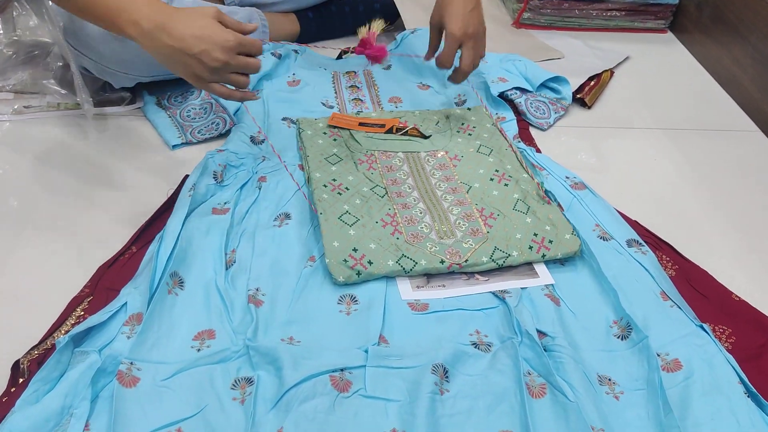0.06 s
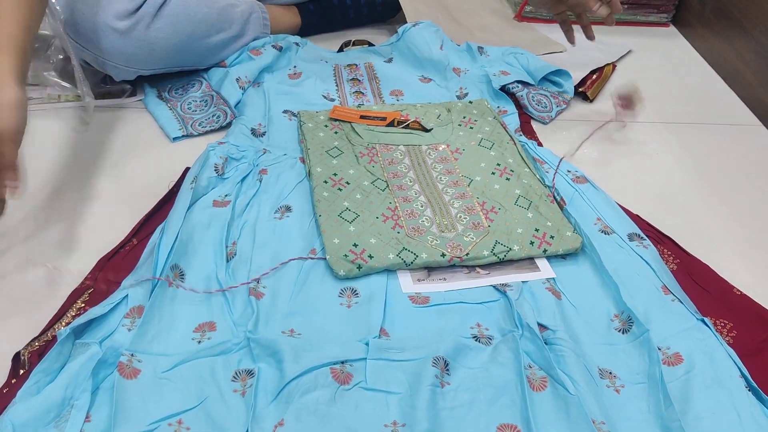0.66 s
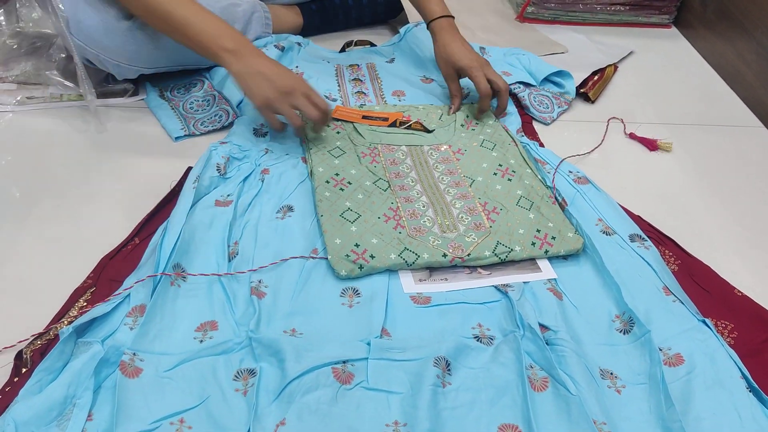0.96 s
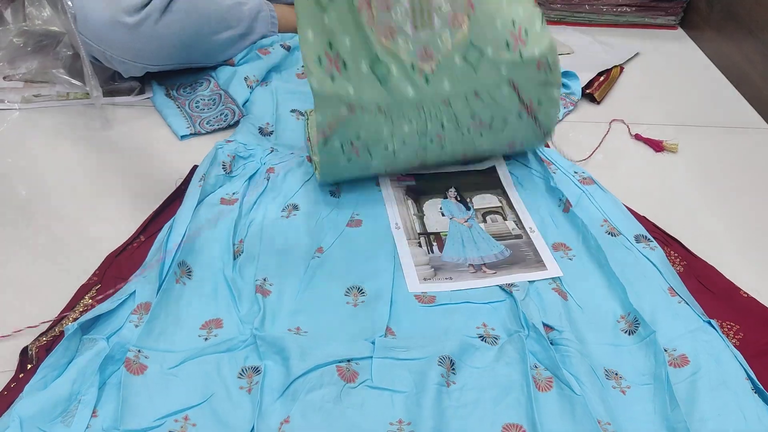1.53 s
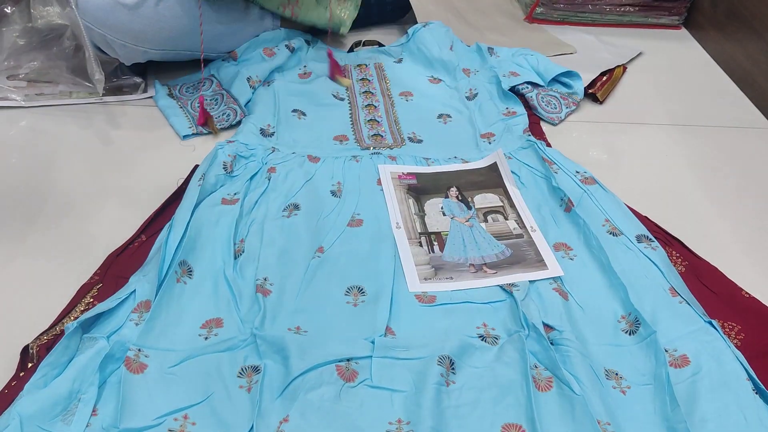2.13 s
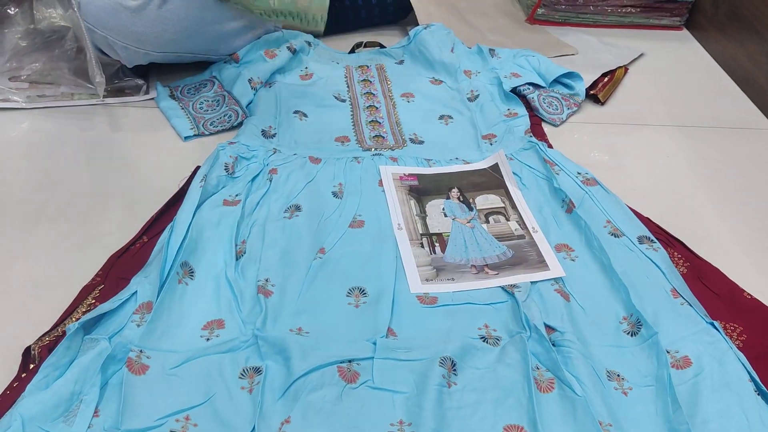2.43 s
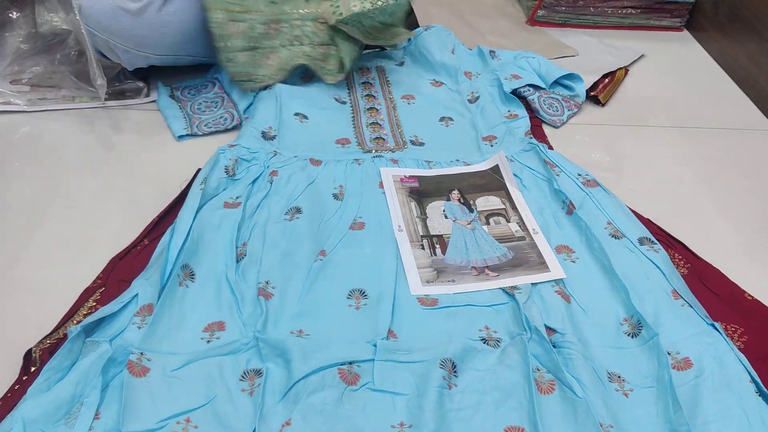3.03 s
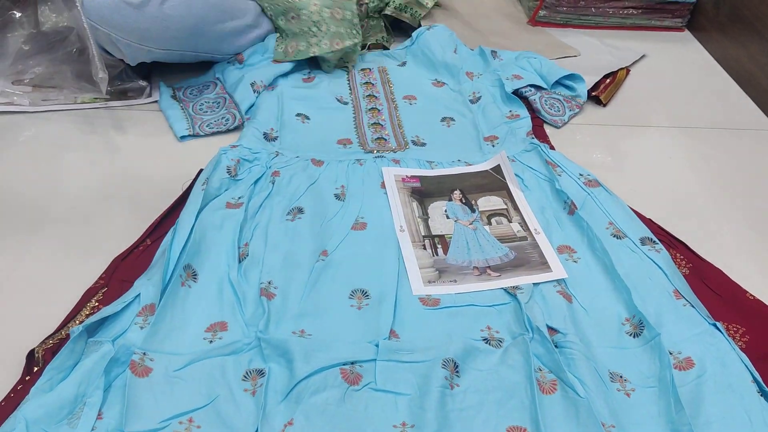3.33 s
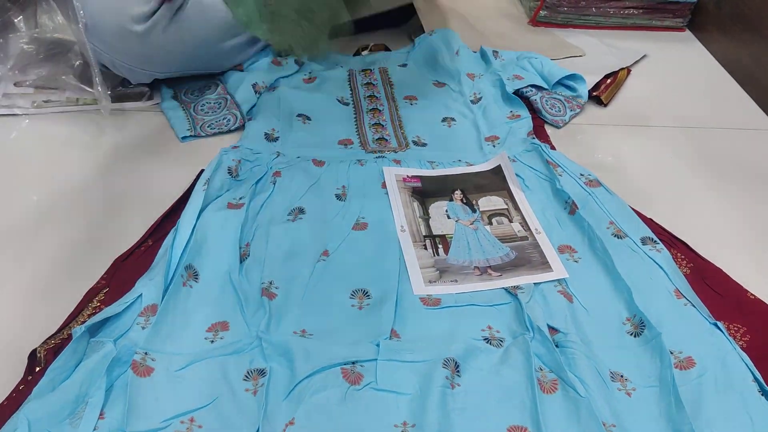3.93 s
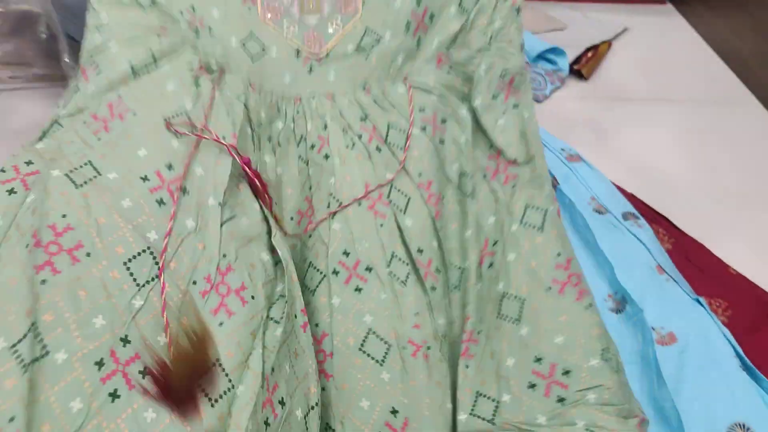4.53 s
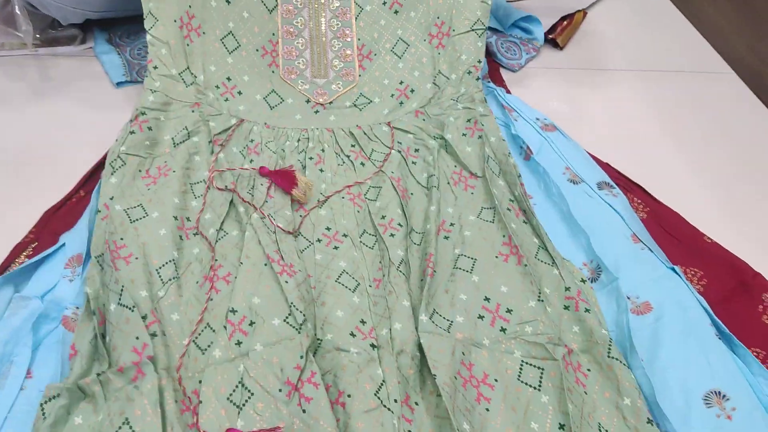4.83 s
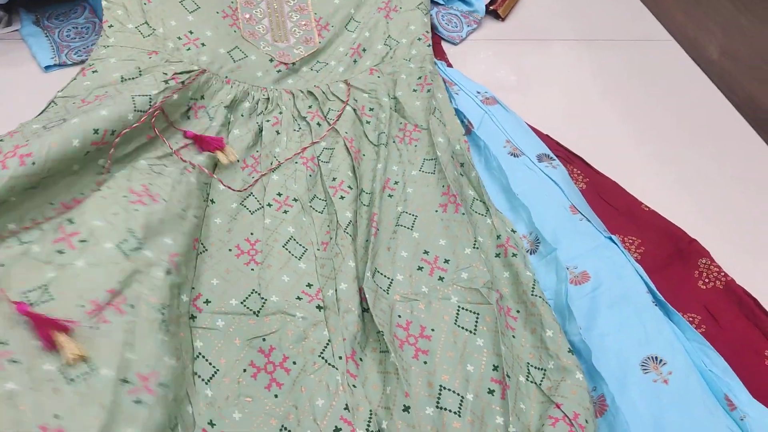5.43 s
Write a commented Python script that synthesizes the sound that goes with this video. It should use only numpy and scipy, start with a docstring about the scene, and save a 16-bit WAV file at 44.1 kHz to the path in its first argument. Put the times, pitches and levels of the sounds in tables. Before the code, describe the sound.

An electric fan whirs steadily for the whole five and a half seconds or so, and its draught buffets the microphone with uneven low rumble and thumps, stronger on the right at first. From about 1.8 to 2.5 seconds, metal trim on a dress clinks faintly as soft cloth swishing begins, with a crease snap and a tassel bead tick near 2.2 seconds. More rustling and small snaps come around 3 seconds, followed by a soft, very quick double knock on the table at 3.2. At 4 seconds the dress is shaken open with one heavy flap and louder swishes. The strongest rustle comes near 4.8 seconds, with a cluster of crisp snaps and another bead tick, then eases into lighter sliding. The handling is close, dry and slightly to the right. The gusts continue to the end, the hardest briefly ducking everything else.

```python
"""An electric fan whirs and its draught buffets the two microphone ports, each in its own way.
Over it a folded dress is lifted, shaken open and spread on a table: cloth swishes against cloth,
creases snap, tassel beads tick and the metal trim clinks, with a soft double knock on the table
and one heavy flap. The hardest puffs make a limiter duck everything for a moment."""
import sys
import numpy as np
from scipy.fft import rfft, irfft, next_fast_len
from scipy.io import wavfile
from scipy.ndimage import uniform_filter1d, minimum_filter1d, map_coordinates

SR = 44100
rng = np.random.default_rng(int(sys.argv[2]) if len(sys.argv) > 2 else 0)


def unload_wav(signal):
    """Save mono or channel-first audio to the path in sys.argv[1] as 16-bit WAV at rate SR, clipped to [-1, 1]."""
    wavfile.write(
        sys.argv[1],
        SR,
        np.round(np.clip(np.atleast_2d(signal).T, -1, 1) * 32767).astype(np.int16),
    )


N = 249606

# cloth sliding on cloth: (peak time [s], rise [s], fall [s], fold swish [dB], hem hiss [dB])
CLOTH_STROKES = [(2.15, 0.51, 0.65, -60, -58), (2.93, 0.087, 0.16, -56.5, -53.5), (3.45, 1, 1, -52, -65),
                 (4.012, 0.064, 0.17, -44, -55), (4.066, 0.035, 0.022, -43, -48),
                 (4.311, 0.0025, 0.07, -43, -47.5), (4.53, 0.18, 0.4, -53.5, -53.5),
                 (4.725, 0.011, 0.07, -37, -40), (4.795, 0.054, 0.13, -39.5, -49),
                 (5.05, 0.04, 0.24, -49, -59), (5.54, 0.073, 0.037, -48, -47)]
# creases snapping: (time [s], level [dB], tilt [dB/octave], low cut [Hz])
CREASE_SNAPS = [(2.053, -29.5, 7, 4500), (2.1773, -22.5, 0, 2800), (3.0265, -22, -0.5, 4100),
                (3.095, -26, -3, 2500), (3.388, -31, -4, 3500), (3.965, -30, -3, 2700),
                (4.307, -23.5, 4, 5400), (4.7423, -25, 0, 3000), (4.771, -19, 1, 2600),
                (4.774, -18, -3, 2600), (4.782, -27, -4, 3400), (4.792, -15.5, 3, 3300),
                (4.801, -20, -1, 3300), (4.808, -21.5, 5, 3900), (4.8505, -26.5, -2, 3700),
                (4.987, -34, 2, 5000), (5.014, -21.5, -0.5, 3300), (5.0972, -30.5, -4, 4300),
                (5.146, -34, -4, 4000)]
# heavy folds flapping: (time [s], level [dB], rise [s], hold [s], fall [s])
FOLD_FLAPS = [(4.032, -37, 0.032, 0.047, 0.012)]
# tone of the folds, the hem, a crease and a flap: (frequency [Hz], relative level [dB])
SWISH_EQ = [(100, -21), (900, 11), (1800, 15), (3200, 15), (6500, 11.5), (8500, 3.5), (12000, 0.5),
            (16000, -11)]
HEM_EQ = [(2000, -50), (5000, 4), (7000, 9.5), (10000, 0), (13000, 1.5), (16000, -5)]
CREASE_EQ = [(1000, -18), (3200, 14.5), (4400, 8), (7500, 6), (10000, -1), (16000, -7)]
FLAP_EQ = [(100, -8), (230, 11), (450, 8), (820, 11), (1050, -3), (1350, 5), (1600, 3), (2200, -11),
           (3200, 1.5), (8000, -40)]
# the trim clinking as the dress sways: (time [s], level [dB])
TRIM_CLINKS = [(1.78, -37), (1.849, -37), (1.984, -38.5), (2.011, -38), (2.037, -37.5), (2.093, -37),
               (2.117, -41), (2.412, -43), (2.445, -39), (2.481, -42)]
# the trim sliding over cloth: (time [s], level [dB], half length [s], pitch [Hz])
TRIM_SLIDES = [(1.79, -58, 0.07, 6360), (3.895, -48, 0.028, 5770)]
# tassel beads meeting, and knocks on the table: (time [s], level [dB])
BEAD_HITS = [(2.1772, -27.5), (4.772, -27)]
TABLE_HITS = [(3.2275, -23), (3.2315, -16)]
# how a bead and the table ring: (frequency [Hz], relative level [dB], t60 [s])
BEAD_MODES = [(3250, 3.5, 0.007), (4300, 1, 0.0076)]
TABLE_MODES = [(266, 1.5, 0.025), (730, 1.5, 0.013), (1220, -9, .03), (2130, -13, 0.019)]

# light draught between the gusts: (time [s], left level [dB], right level [dB])
BREEZE_BED = [(0, -41.5, -37.5), (0.48, -45, -36.5), (1.1, -39.5, -23), (2.05, -44.5, -34),
              (2.7, -39.5, -58), (3.7, -28, -25.5), (4.3, -32.5, -27.5), (5.1, -35, -17.5),
              (5.46, -35, -27)]
# gusts over the ports: (start [s], hold [s], left level [dB], right level [dB], base cutoff [Hz])
PORT_GUSTS = [(0.264, 0.086, -54, -22, 259), (0.604, 0.053, -22, -16.5, 450), (0.725, 0.079, -39, -17, 272),
              (0.854, 0.062, -44, -15.5, 325), (0.977, 0.096, -21.5, -27, 172),
              (1.203, 0.045, -27, -17.5, 272), (1.361, 0.011, -32, -10.5, 477),
              (1.641, 0.016, -24.5, -16.5, 286), (1.712, 0.054, -20, -16.5, 425),
              (2.069, 0.0086, -17.5, -32.5, 227), (2.199, 0.028, -33, -21.5, 317),
              (2.363, 0.16, -23, -24, 233), (2.793, 0.009, -25, -36, 170), (2.896, 0.031, -27, -23, 248),
              (3.054, 0.17, -47, -22.5, 201), (3.283, 0.031, -23.5, -27, 193),
              (3.421, 0.018, -8.5, -25.5, 207), (3.507, 0.13, -25.5, -20.5, 208),
              (3.845, 0.046, -18, -17.5, 253), (3.998, 0.18, -23.5, -21.5, 235),
              (4.215, 0.15, -47, -19.5, 255), (4.523, 0.048, -33, -18.5, 214),
              (4.74, 0.0094, -33, -14.5, 350), (4.911, 0.276, -19.5, -22.5, 284),
              (5.236, 0.086, -17.5, -20, 250), (5.548, 0.15, -15.5, -16.5, 257)]
# lulls between puffs, at both ports: (time [s], depth [dB], half length [s])
AIR_LULLS = [(0.459, 9.5, 0.05), (0.672, 12, 0.0068), (0.846, 7, 0.014), (2.047, 10.5, 0.037),
             (2.134, 10, 0.023), (2.318, 19, 0.011), (2.637, 13, 0.029), (3.39, 16, 0.011),
             (3.755, 15, 0.013), (4.445, 5.5, 0.033), (5.438, 10, 0.026)]
# single strong eddies: (time [s], level [dB], pitch [Hz], port [0 left, 1 right])
EDDY_HITS = [(0.298, -8, 250, 1), (.613, -0.5, 385, 1), (0.626, -5, 153, 1), (0.635, 2.5, 390, 1),
             (0.733, -0.5, 83, 1), (0.891, -7, 160, 1), (0.912, -5.5, 270, 1), (1.109, -2.5, 81, 0),
             (1.213, -0.5, 120, 1), (1.2653, -6.5, 400, 1), (1.267, 2.5, 212, 1), (1.366, -2, 390, 1),
             (1.379, -2.5, 272, 1), (1.741, -0.5, 295, 1), (1.966, -0.5, 53.3, 1), (2.939, -9, 285, 1),
             (3.425, -18, 196, 0), (3.629, -1.5, 180, 1), (3.939, -13, 320, 1), (4.001, -2.5, 109, 1),
             (4.082, -2.5, 104, 0), (4.102, 0.5, 116, 1), (4.223, -3, 145, 1), (4.287, 0, 57, 1),
             (4.308, -8, 372, 1), (4.517, 0.5, 60, 1), (4.751, -3, 201, 1), (5.05, -4, 295, 1),
             (5.0986, -0.5, 280, 1), (5.605, 3.5, 54.5, 0)]
# tone of small eddies, large slow eddies and the fan's air: (frequency [Hz], relative level [dB])
BUFFET_EQ = [(20, -88), (70, -8), (110, 0.8), (180, -2), (300, -7.5), (550, -18.5), (800, -26),
             (2000, -120)]
SURGE_EQ = [(3, -48), (13, 3), (40, 0), (75, -3.5), (105, -7.5), (170, -20), (500, -130)]
FAN_EQ = [(40, -15), (230, -1), (330, 2.5), (420, -5.5), (500, -1.5), (720, -11), (970, -5.5), (1080, -7),
          (1220, -6.5), (1450, -15.5), (1600, -8), (1700, -6.5), (1950, -13.5), (2400, -13), (3000, -18),
          (7000, -24), (8200, -31.5), (16000, -41)]
# narrow resonances in the fan's air noise: (frequency [Hz], boost [dB])
FAN_RESONANCES = [(472, 1), (880, 4.5), (947, 8), (1005, 6.5), (1152, 5), (1220, 1), (1622, 3)]
# the fan's stereo width: (frequency [Hz], left-right correlation [0 to 1])
FAN_CORRELATION = [(100, 1), (400, 0.9), (1000, 0.46), (2000, 0.098), (3300, 0.021), (16000, 0)]
# the fan's stereo position: (frequency [Hz], left minus right [dB])
FAN_PAN = [(100, -0.5), (700, 1), (1300, -2.5), (2400, -2), (8000, -2), (15000, 1)]


def cloth():
    """Each stroke swells and fades, with the broad swish of the folds and the thin hiss of the hem."""
    strokes = [np.outer(amp([folds_db, hem_db]), swell(s, 0, rise, fall))
               for s, rise, fall, folds_db, hem_db in CLOTH_STROKES]
    folds, hem = np.sqrt(sum(stroke ** 2 for stroke in strokes))
    return (folds * rub(SWISH_EQ, catches_per_s=470, catch_db=-4)
            + hem * rub(HEM_EQ, catches_per_s=240, catch_db=-2))


def rub(eq, catches_per_s, catch_db, uneven_db=2.5):
    """Friction of the weave: a smooth rush plus tiny catches of single threads."""
    texture = rng.standard_normal((2, N)) + amp(catch_db) * grains(catches_per_s, channels=2)
    return coloured(texture, eq) * amp(uneven_db * wobble(45))


def creases(attack_s=0.0002, snap_t60_s=0.0055, tail_db=-33, tail_t60_s=0.12):
    """A crease snaps in a short burst, thinner for a smaller crease; the cloth settles after it."""
    out, t = np.zeros((2, N)), np.arange(SR // 20) / SR
    decay = amp(-60 * t / snap_t60_s) + amp(tail_db - 60 * t / tail_t60_s)
    envelope = (1 - np.exp(-t / attack_s)) * decay
    for s, db, tilt, low_cut_hz in CREASE_SNAPS:
        def tone(hz):
            tilted = amp(along(CREASE_EQ, hz) + tilt * np.log2(hz / SR + 1e-3))
            return unit(tilted / np.sqrt(1 + (low_cut_hz / (hz + 1)) ** 10))
        burst = even(filtered(rng.standard_normal((2, len(t))), tone), span_s=0.0012)
        add(out, s - attack_s, amp(db) * envelope * burst)
    return out


def flap(flutter_db=2.0, flutters_per_s=90):
    """Heavy cloth gathers speed, flutters and stops short as it pulls taut."""
    speed = sum(amp(db) * swell(s, hold, rise, fall) for s, db, rise, hold, fall in FOLD_FLAPS)
    flutter = amp(flutter_db * wobble(flutters_per_s))
    return speed * flutter * coloured(rng.standard_normal((2, N)), FLAP_EQ)


def trim(clink_hz=5620, attack_s=0.00042, t60_s=0.0087):
    """The metal trim gives short, dry clinks when it sways and a thin hiss when it slides."""
    t = np.arange(N) / SR
    clinks = sum(amp(db) * swell(s, 0, attack_s, t60_s / np.log(1000)) for s, db in TRIM_CLINKS)
    slides = sum(amp(db) * np.exp(-((t - s) / half) ** 2) * shimmer(hz)
                 for s, db, half, hz in TRIM_SLIDES)
    return clinks * shimmer(clink_hz) + slides


def shimmer(centre_hz, half_width_hz=550):
    """Many tiny metal pieces ringing at nearly one pitch, at a steady level."""
    band = filtered(rng.standard_normal((2, N)), lambda hz: peak(hz, centre_hz, half_width_hz))
    return even(band, span_s=0.006)


def taps(hits, modes, attack_s):
    """Each hit rings the modes of a bead or the table, a little differently left and right."""
    out, t = np.zeros((2, N)), np.arange(SR // 10) / SR
    for s, db in hits:
        ring = 0
        for hz, mode_db, t60 in modes:
            decay = amp(mode_db + rng.normal(0, 0.93, (2, 1)) - 60 * t / t60)
            phase = rng.normal(0, 0.98, (2, 1))
            ring += decay * np.sin(2 * np.pi * hz * t + phase)
        add(out, s, amp(db) * (1 - np.exp(-t / attack_s)) * ring)
    return out


def draught():
    """Wind rumble at both ports, broken by lulls and punched by single eddies."""
    left = turbulence(0, octaves_up=-0.52, brighten=0.033, buffet_db=-2, surge_db=-18.5, follow=0.57)
    right = turbulence(1, octaves_up=0.022, brighten=0.06, buffet_db=0.48, surge_db=-17, follow=0.35)
    t = np.arange(N) / SR
    lull_db = sum(db * np.exp(-((t - s) / half) ** 2) for s, db, half in AIR_LULLS)
    return np.array([left, right]) * amp(-lull_db) + eddies()


def airflow(port, breeze_cutoff_hz=224, attack_s=0.0075, release_s=0.03):
    """Level [dB] and base cutoff [Hz] of breeze plus gusts at one port; the strongest sets the tone."""
    power = amp(curve(np.array(BREEZE_BED)[:, [0, 1 + port]])) ** 2
    weighted_hz = power * breeze_cutoff_hz
    for s, hold, *port_db, cutoff_hz in PORT_GUSTS:
        gust = (amp(port_db[port]) * swell(s, hold, attack_s, release_s)) ** 2
        power += gust
        weighted_hz += gust * cutoff_hz
    return 10 * np.log10(power), weighted_hz / power


def turbulence(port, octaves_up, brighten, buffet_db, surge_db, follow, swing_db=1.35, swings_per_s=22):
    """A hail of small eddies over slow surges at one port; faster air is louder and brighter."""
    flow_db, cutoff_hz = airflow(port)
    excess_db = flow_db - np.median(flow_db)
    swirl = coloured(grains(110, channels=1)[0] + 0.43 * rng.standard_normal(N), BUFFET_EQ)
    octave = np.clip(np.log2(cutoff_hz / 100) + octaves_up + brighten * excess_db, 0, 3)
    buffets = np.zeros(N)
    for k in range(4):  # cross-fade between low-passes an octave apart
        dull = filtered(swirl, lambda hz: 1 / np.sqrt(1 + (hz / (100 * 2 ** k)) ** 6))
        buffets += np.maximum(1 - abs(octave - k), 0) * dull
    surge = even(coloured(rng.standard_normal(N), SURGE_EQ), span_s=0.5)
    surge *= amp(surge_db + follow * excess_db)  # the largest eddies follow the gusts only loosely
    jolts_db = swing_db * wobble(swings_per_s)  # each gust breaks into separate buffets
    return even(buffets, span_s=0.036) * amp(flow_db + buffet_db + jolts_db) + surge


def eddies():
    """A strong eddy thumps one port: a short dip of pressure between two slight rises."""
    out, t = np.zeros((2, N)), np.arange(-SR // 20, SR // 20) / SR
    for s, db, hz, port in EDDY_HITS:
        spread = (np.pi * hz * t) ** 2
        add(out[round(port)], s + t[0], amp(db) * (spread - 1) * np.exp(-spread))
    return out


def fan(level_db=-38, fade_db_per_s=0.2, shaft_hz=21.4, flutter_depth=0.15):
    """Air noise from the blades, fluttering once and twice per turn of the shaft and slowly fading."""
    t = np.arange(N) / SR
    air = fan_air()
    angle = 2 * np.pi * shaft_hz * t + 0.12 * wobble(1.7)
    flutter = flutter_depth * (np.cos(angle) + np.cos(2 * angle))
    # the mids flutter most
    mids = filtered(air, lambda hz: along([(400, 0.31), (900, 0.96), (2200, 0.47), (4000, 0.31)], hz))
    return amp(level_db - fade_db_per_s * t) * (air + flutter * mids)


def fan_air(half_width_hz=4.9):
    """The fan's steady rush with narrow whirring resonances, centred in the bass and wide on top."""
    def mid_side(hz):
        width = np.arccos(np.clip(along(FAN_CORRELATION, hz), -1, 1)) / 2
        return np.array([np.cos(width), np.sin(width)])
    mid, side = filtered(rng.standard_normal((2, N)), mid_side)
    pan = lambda hz: amp(np.outer([0.5, -0.5], along(FAN_PAN, hz)))
    whirr = lambda hz: amp(sum(db * peak(hz, centre, half_width_hz) for centre, db in FAN_RESONANCES))
    stereo = filtered(np.array([mid + side, mid - side]), pan)
    return coloured(filtered(stereo, whirr), FAN_EQ)


def amp(db):
    """Decibels to gain."""
    return 10 ** (np.asarray(db) / 20)


def unit(x):
    """Scale to rms 1."""
    return x / np.sqrt(np.mean(x ** 2) + 1e-20)


def along(points, hz):
    """(frequency [Hz], value) points read on a log axis."""
    frequencies, values = np.transpose(points)
    return np.interp(np.log(hz + 1), np.log(frequencies + 1), values)


def peak(hz, centre_hz, half_width_hz):
    """A resonance bell of height 1."""
    return 1 / (1 + ((hz - centre_hz) / half_width_hz) ** 2)


def curve(rows):
    """(time [s], value) rows as one value per sample."""
    return np.interp(np.arange(N) / SR, *np.transpose(rows))


def swell(start, hold, rise, fall):
    """An envelope that grows until start, holds at 1 and dies away; rise and fall are time constants."""
    t = np.arange(N) / SR - start
    return np.exp(np.maximum(np.minimum(t, 0) / rise - np.maximum(t - hold, 0) / fall, -30))


def wobble(rate):
    """A smooth random curve, rate knots a second."""
    return map_coordinates(rng.standard_normal(int(N * rate / SR) + 4), [np.arange(N) * rate / SR])


def grains(rate, channels):
    """Random impulses at rms 1, at the same moments in every channel."""
    return unit((rng.random(N) < rate / SR) * rng.uniform(-1.0, 1, (channels, N)))


def filtered(x, response):
    """x through a gain that depends on frequency."""
    n = x.shape[-1]
    padded = next_fast_len(n + 8192)
    return irfft(rfft(x, padded) * response(np.fft.rfftfreq(padded, 1 / SR)), padded)[..., :n]


def coloured(x, eq):
    """x through an EQ curve, at rms 1."""
    return unit(filtered(x, lambda hz: amp(along(eq, hz))))


def even(x, span_s):
    """Noise with its chance swells longer than span_s levelled out."""
    size = int(span_s * SR) + 1
    return x / np.sqrt(abs(uniform_filter1d(uniform_filter1d(x ** 2, size), size)) + 1e-6)


def add(track, s, sound):
    """Mix a short sound into a track at time s."""
    part = track[..., max(round(s * SR), 0):][..., :sound.shape[-1]]
    part += sound[..., :part.shape[-1]]


def limiter(x, ceiling=0.88, release_s=0.13):
    """Both channels duck at once under a peak and recover slowly."""
    over_db = np.maximum(20 * np.log10(abs(x).max(axis=0) / ceiling + 1e-9), 0)
    fade = np.exp(-np.arange(N) / SR / release_s)
    held_db = np.maximum.accumulate(over_db / fade) * fade
    return x * uniform_filter1d(minimum_filter1d(amp(-held_db), size=129), size=129)


def scene():
    """Close, dry handling of the dress over the fan and its draught."""
    beads = taps(BEAD_HITS, BEAD_MODES, attack_s=0.00038)
    knock = taps(TABLE_HITS, TABLE_MODES, attack_s=0.0012)
    dress = (cloth() + trim() + creases() + beads) * amp([[-0.7], [0.7]])  # slightly to the right
    return dress + flap() + knock + fan() + draught()


def record(dry):
    """Limit the peaks, then cut the very top of the treble."""
    return filtered(limiter(dry), lambda hz: hz < 16050)


dry = scene()
out = record(dry)
unload_wav(out)
```